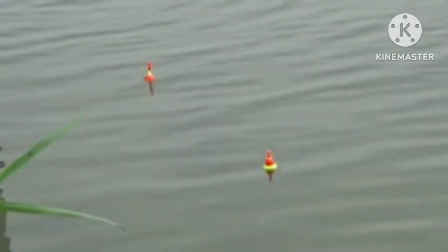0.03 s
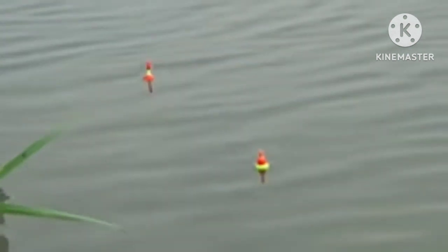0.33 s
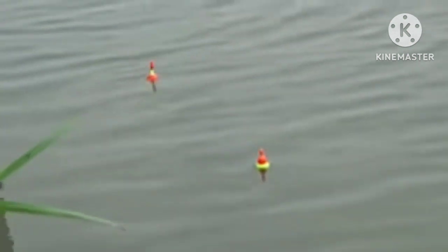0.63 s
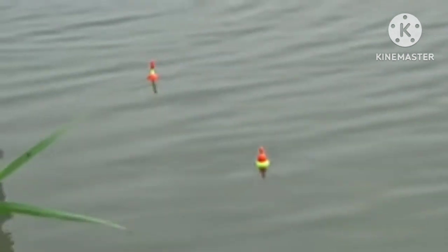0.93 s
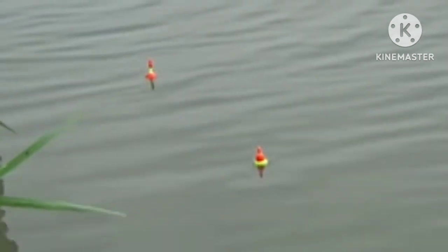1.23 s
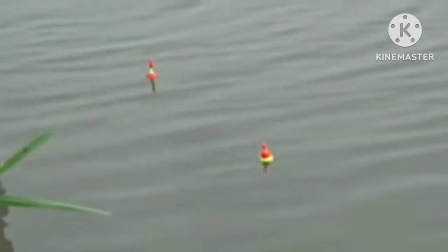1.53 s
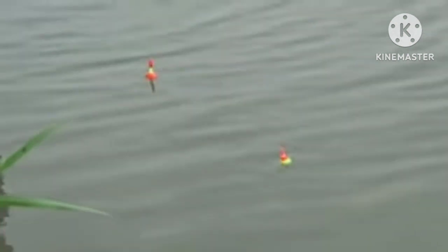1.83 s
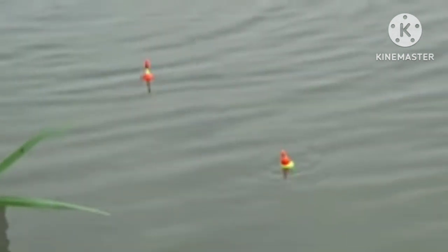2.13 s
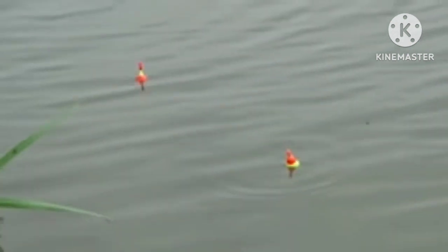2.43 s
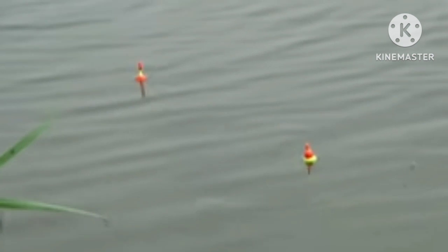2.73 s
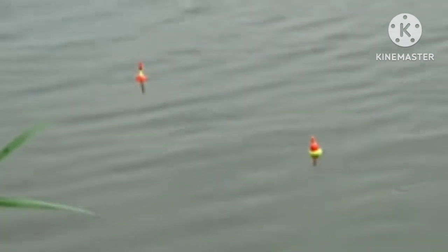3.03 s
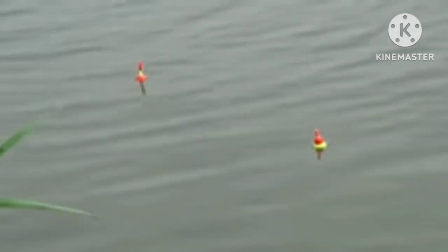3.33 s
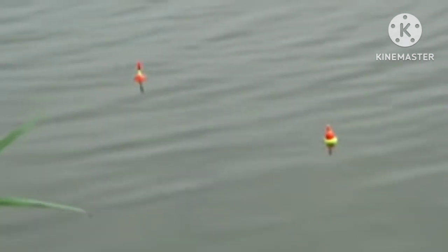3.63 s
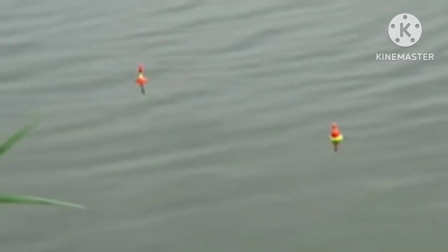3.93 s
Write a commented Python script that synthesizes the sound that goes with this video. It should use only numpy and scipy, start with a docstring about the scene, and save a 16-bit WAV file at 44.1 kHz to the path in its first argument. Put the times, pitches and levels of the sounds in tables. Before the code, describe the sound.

Beside a pond, a bird whistles quick upward notes, about three a second, climbing higher in the second half. Short frog croaks and another faint bird sit behind it, with a soft wash of water and a far motor.

```python
"""A bird's rising whistles ring out over a pond, growing higher and louder, each with a tail of tree echo.
Every whistle is a tone that scoops up and frays as it drops. A second bird slides faintly behind it.
Frogs croak in short trains of pulses, each pulse ringing the throat.
Underneath lies a bed of rippling water (a wash of shaped noise) and a far motor (wavering tones)."""
import sys
import numpy as np
from scipy import signal
from scipy.fft import rfft, irfft
from scipy.io import wavfile
from scipy.ndimage import map_coordinates

SR = 44100
rng = np.random.default_rng(int(sys.argv[2]) if len(sys.argv) > 2 else 0)


def dump_mix(stems):
    """Bounce the given channels to the path in sys.argv[1] as a 16-bit WAV at rate SR."""
    frames = np.atleast_2d(stems).T  # one column per channel
    limited = np.clip(frames, -1, 1)  # hard clip at full scale
    pcm = np.round(limited * 32767).astype(np.int16)
    wavfile.write(sys.argv[1], SR, pcm)


N = 176400
TIME = np.arange(N) / SR


def undb(db):
    """Decibels to gain."""
    return 10 ** (np.asarray(db) / 20)


def unit(x):
    """Scale to rms 1."""
    return x / np.sqrt(np.mean(x ** 2) + 1e-18)


def wobble(rate, size=N):
    """Smooth random modulator: `rate` new values a second, spread near 1."""
    return map_coordinates(rng.standard_normal(512), [np.arange(size) * rate / SR], order=3, mode="mirror")


def pan(db):
    """Left and right gains for a level difference."""
    return undb(np.array([[db], [-db]]) / 2)


def add(out, start, x):
    """Mix a sound in at `start` seconds."""
    i = max(int(start * SR), 0)
    part = x[..., :N - i]
    out[..., i:i + part.shape[-1]] += part


def noise(colour):
    """Wide stereo noise at rms 1, shaped by an EQ curve."""
    hz, db = np.array(colour).T
    bin_hz = np.arange(N // 2 + 1) * SR / N
    gain = undb(np.interp(np.log(bin_hz + 1), np.log(hz), db))
    return unit(irfft(rfft(rng.standard_normal((2, N))) * gain, N))


def tree_echo(x, t60, early_db=10, early_t60=0.046, build_s=0.016):
    """Stereo reverb of many weak and a few strong echoes: near trees first, then the far bank."""
    t = np.arange(SR) / SR
    decay = undb(-60 * t / t60) + undb(early_db - 60 * t / early_t60)
    build = 1 - np.exp(-t / build_s)
    echoes = decay * build * rng.standard_normal((2, SR)) * np.exp(rng.standard_normal((2, SR)))
    return signal.fftconvolve(np.atleast_2d(x), unit(echoes) / np.sqrt(SR), axes=1)[:, :N]


# Motor drones: start f/Hz, end f/Hz, peak t/s, swell width/s, level/dB, left phase lead/rad
HUM_TONES = [(106.6, 108, 3.6, 0.39, -53, 2.1), (86, 53, 5.3, 2.3, -65, 0.97),
             (116.1, 91, 0.57, 2, -59, 3.4), (210.6, 202, 2.84, 0.55, -55.5, 2.55),
             (242, 260, 0.6, 5.9, -65, 2.3), (308, 300, 1.37, 0.81, -64.5, 0.5),
             (368, 372, 3.57, 0.46, -60, 1.4), (499, 450, 0.44, 0.49, -64, 0.71)]


def motor_hum():
    """The far motor's low tones glide, swell and fade, reaching each side at a different phase."""
    out = np.zeros((2, N))
    for start_hz, end_hz, peak, width, db, lead in HUM_TONES:
        hz = np.linspace(start_hz, end_hz, N) * (1 + 0.0054 * wobble(14))
        phase = 2 * np.pi * np.cumsum(hz) / SR
        swell = np.exp(-0.5 * ((TIME - peak) / width) ** 2)
        out += np.sqrt(2) * np.sin([phase + lead, phase]) * swell * undb(db + 1.5 * wobble(5.58))
    return out


# Pitch and level ride of the whine: t/s, f/Hz, level/dB
WHINE_RIDE = [(1.9, 1098, -73), (2.3, 1098, -67), (2.5, 1093, -70), (2.82, 1096, -58.5),
              (3.15, 1075, -65.5), (3.55, 1071, -63), (4, 1075, -69)]


def motor_whine():
    """A thin, unsteady tone of the motor that sinks slightly."""
    when, hz, db = np.array(WHINE_RIDE).T
    pitch = np.interp(TIME, when, hz) * (1 + 0.0041 * wobble(60))
    return np.sqrt(2) * np.sin(2 * np.pi * np.cumsum(pitch) / SR) * undb(np.interp(TIME, when, db))


# EQ of the water bed: f/Hz, relative level/dB
WASH_EQ = [(20, -35), (36, -15), (52, -7), (85, -1), (110, 5), (160, 0.5), (220, 5), (380, 0.5), (550, -3),
           (700, -10.5), (900, -7), (1400, -8.5), (2200, -8.5), (3200, -10), (4200, -13.5), (5600, -19),
           (7000, -17.5), (10000, -18.5), (15000, -26)]
# EQ of the water's midrange swell: f/Hz, relative level/dB
SWELL_EQ = [(100, -30), (350, -2.5), (560, 4.5), (720, -9), (900, -2.5), (1500, 1.5), (2500, -4),
            (5000, -0.5), (12000, -92)]
# Fader ride of that swell: t/s, level/dB
SWELL_RIDE = [(0, -59), (1.2, -58.5), (2.3, -52), (2.8, -49), (3.4, -49.5), (4, -46.5)]


def water(wash_db=-50, crossfeed=0.011, ripple_rate=12):
    """Rippling water: a wide, softly flickering wash whose mids swell in the second half."""
    wash = noise(WASH_EQ)
    wash = unit(wash + crossfeed * wash[::-1]) * undb(wash_db + 0.25 * wobble(ripple_rate))
    swell_db = np.interp(TIME, *np.array(SWELL_RIDE).T)
    return wash + noise(SWELL_EQ) * undb(swell_db + 3.25 * wobble(ripple_rate))


BIRD_T60_S, BIRD_WAVER_RATE = 0.69, 760  # both birds: reverb time, pitch wobbles a second
# Far bird cues: t/s, length/s, start f/Hz, end f/Hz, level/dB, dry trim/dB
SLIDE_CUES = [(0.235, 0.085, 3100, 1980, -55, 1), (0.629, 0.071, 3350, 4230, -59.5, -5),
              (1.071, 0.051, 2800, 3070, -58, 2), (1.107, 0.094, 3100, 4420, -56, -6),
              (1.293, 0.1, 7040, 7780, -63, -1.5), (2.539, 0.054, 2730, 3250, -65, 8),
              (2.588, 0.12, 3200, 4530, -60, -4), (2.817, 0.04, 2450, 3030, -54.5, 2)]


def far_bird(waver=0.016, send_db=4):
    """Thin, straight slides of a single tone; some arrive mostly as echo."""
    direct, send = np.zeros(N), np.zeros(N)
    for start, length, start_hz, end_hz, db, dry_db in SLIDE_CUES:
        progress = np.linspace(0, 1, int(length * SR))
        hz = start_hz + (end_hz - start_hz) * progress
        hz *= 1 + waver * wobble(BIRD_WAVER_RATE, len(hz))
        arch = np.sqrt(progress * (1 - progress))
        slide = undb(db) * unit(arch * np.sin(2 * np.pi * np.cumsum(hz) / SR))
        add(direct, start, undb(dry_db) * slide)
        add(send, start, undb(send_db) * slide)
    return direct + tree_echo(send, BIRD_T60_S)


# Throat resonances: multiple of the throat pitch, relative level/dB, t60/s
THROAT_MODES = [(.42, -10, 0.019), (.79, -8.5, 0.048), (0.974, 12.5, 0.021), (1.099, 3.5, 0.028),
                (1.35, -44, 0.005)]
# Croak cues: t/s, length/s, pulse rate/Hz, throat f/Hz, level before the mix/dB, pan L-R/dB
CROAK_CUES = [(0.031, 0.034, 167, 2090, -51.5, -2), (0.126, 0.062, 190, 2250, -41, -0.5),
              (0.356, 0.043, 208, 2170, -46.5, -1), (0.566, 0.029, 180, 2120, -45.5, 0),
              (0.759, 0.034, 185, 2250, -49, 3), (0.837, 0.041, 174, 2020, -54, -2),
              (0.936, 0.03, 170, 2180, -49.5, 1), (1.108, 0.035, 200, 2230, -48, -1),
              (1.28, 0.072, 186, 2410, -43, 2.5), (1.556, 0.053, 160, 2140, -54, -3),
              (1.671, 0.042, 178, 2310, -41, 2), (2.084, 0.047, 204, 2250, -44.5, 2),
              (2.246, 0.054, 130, 2430, -44.5, 5), (2.395, 0.026, 124, 2090, -44, -3),
              (2.495, 0.1, 107, 2050, -44, -2), (2.595, 0.042, 144, 1890, -43, 0),
              (2.651, 0.035, 112, 1830, -45.5, -3), (2.747, 0.071, 180, 1750, -44.5, -1),
              (2.827, 0.038, 127, 1780, -47.5, 4), (2.913, 0.09, 150, 1990, -42.5, 1),
              (3.102, 0.031, 160, 2050, -45.5, 1), (3.177, 0.051, 184, 2177, -39, 1.5),
              (3.386, 0.032, 160, 2220, -49, 0), (3.526, 0.044, 136, 2350, -44.5, 4),
              (3.675, 0.055, 165, 2230, -43, 3), (3.828, 0.064, 215, 2435, -43.5, 3)]


def frogs(dry_db=-3, send_db=-3.5):
    """A croak is an arch of uneven pulses, each briefly ringing the throat."""
    out, t = np.zeros((2, N)), np.arange(1024) / SR
    for start, length, rate, hz, db, pan_db in CROAK_CUES:
        croak, scatter = np.zeros(SR // 4), rng.standard_normal((40, 3))
        count = int(length * rate)
        for k, (late, soft, sharp) in enumerate(scatter[:count]):
            throat_hz = hz * (1 + 0.053 * sharp)
            ring = sum(undb(mode_db - 60 * t / t60) * np.sin(2 * np.pi * ratio * throat_hz * t)
                       for ratio, mode_db, t60 in THROAT_MODES)
            arch = np.sin(np.pi * (k + 0.5) / count) ** 0.44
            add(croak, (k + 0.5 + 0.07 * late) / rate, arch * undb(-0.5 * soft) * ring)
        croak = unit(croak) * np.sqrt(length * SR / len(croak))  # rms near 1 while it sounds
        add(out, start, pan(pan_db) * undb(db) * croak)
    out = signal.sosfilt(signal.butter(2, 700, "high", fs=SR, output="sos"), out)
    return undb(dry_db) * out + undb(send_db) * tree_echo(out, t60=0.26)


BEAK_HZ, BEAK_WIDTH_HZ, BEAK_DB = 7070, 620, 14  # resonance that lifts the overtones
RASP_RAD, RASP_RATE = 0.41, 1100  # phase grit on the overtones: depth, wobbles a second
# EQ of the air that drives the whistle: f/Hz, relative level/dB
BREATH_EQ = [(800, -14), (2000, 0), (3000, 1), (4600, 10), (5800, -28.5), (7500, -2.5), (10000, -11.5),
             (14000, -30)]
# Whistle cues: t/s, climb/s, fall/s, start f/Hz, top f/Hz, end f/Hz, bend (1 straight, 3 steep then flat),
# level before the mix/dB, 3/2 overtone/dB, pitch sag/fraction, echo send/dB, onset against the top/dB
WHISTLE_CUES = [(.108, 0.098, 0.037, 3037, 3413, 2850, 2.47, -50.5, -13, 0.011, 0.5, 5),
                (0.493, 0.053, 0.027, 3195, 3333, 2810, 1.64, -42.5, -19, 0.0071, -2.5, 3.5),
                (.84, .07, 0.039, 3183, 3386, 2900, 1.6, -42, -16, 0.012, -2.5, 1.5),
                (1.19, 0.068, 0.038, 2990, 3389, 2580, 2.64, -42, -15, 0.008, 0.5, -0.5),
                (1.447, 0.076, 0.042, 3144, 3680, 2497, 1.74, -35, -6.5, 0.016, -0.5, -4),
                (1.686, 0.11, .045, 3426, 4945, 3325, 1.5, -32, -29, 0.024, -1.5, -3),
                (1.929, 0.11, 0.038, 3170, 4893, 2610, 1.67, -34, -29.5, .03, -1, -4),
                (2.186, .12, .04, 3448, 4952, 2640, 1.6, -36, -31, .022, 0.2, -2),
                (2.68, .078, 0.03, 3188, 3938, 2474, 1.28, -34.5, -13, 0.00926, -2, -6.5),
                (2.988, .082, 0.074, 3712, 6635, 4310, 1.93, -37.5, -33, .04, -1.5, 2),
                (3.297, 0.17, 0.13, 3440, 5430, 4170, 2.7, -36.5, -27, 0.041, -1, -3.5),
                (3.7, 0.08, 0.037, 3150, 4420, 3270, 2, -41.5, -27, 0.029, -1, -2),
                (3.969, 0.075, .04, 2890, 4040, 2980, 1.8, -38.5, -37, 0.041, -1, -6)]


def lead_bird(attack_s=0.0045, flutter_db=3, sub_db=-26, breath_db=-18, dry_db=-8):
    """Each whistle climbs, rounds off and frays as it falls; partial 2 sings under raspy overtones."""
    direct, send, air = np.zeros(N), np.zeros(N), noise(BREATH_EQ)[0]
    for start, climb, fall, low, top, end, bend, db, overtone_db, sag, send_db, onset_db in WHISTLE_CUES:
        size = int((climb + fall) * SR)
        t = np.arange(size) / SR
        climb_left = np.maximum(1 - t / climb, 0) ** bend
        fallen = np.clip((t - climb) / fall, 0, 1)
        hz = top - (top - low) * climb_left - (top - end) * fallen ** 1.5
        fray = (sag + 0.076 * fallen) * (1 + np.tanh(wobble(BIRD_WAVER_RATE, size)))
        phase = np.pi * np.cumsum(hz * (1 - fray)) / SR  # runs an octave below the heard pitch
        breath = np.roll(air, -int(start * SR))[:size]
        voice = np.sin(2 * phase) + undb(sub_db) * np.sin(phase) + undb(breath_db) * breath
        for k, partial_db in [(3, overtone_db), (4, -26), (5, -40)]:
            beak_db = BEAK_DB * np.exp(-((k * hz / 2 - BEAK_HZ) / BEAK_WIDTH_HZ) ** 2)
            voice += undb(partial_db + beak_db) * np.sin(k * phase + RASP_RAD * wobble(RASP_RATE, size))
        envelope = np.tanh(t / attack_s) ** 2 * undb(onset_db * climb_left) * (1 - fallen) ** 0.48
        whistle = np.sqrt(2) * voice * envelope * undb(db + flutter_db * wobble(158.3, size))
        add(direct, start, undb(dry_db) * whistle)
        add(send, start, undb(send_db) * whistle)
    return pan(db=1) * (direct + tree_echo(send, BIRD_T60_S))


def scene():
    """The mix: birds and frogs over the bed of water and motor."""
    return lead_bird() + far_bird() + frogs() + water() + motor_hum() + motor_whine()


def record(dry):
    """A steep high cut at 15.4 kHz on the master."""
    return signal.sosfilt(signal.ellip(10, 0.2, 70, 15400, fs=SR, output="sos"), dry)


dry = scene()
out = record(dry)
dump_mix(out)
```